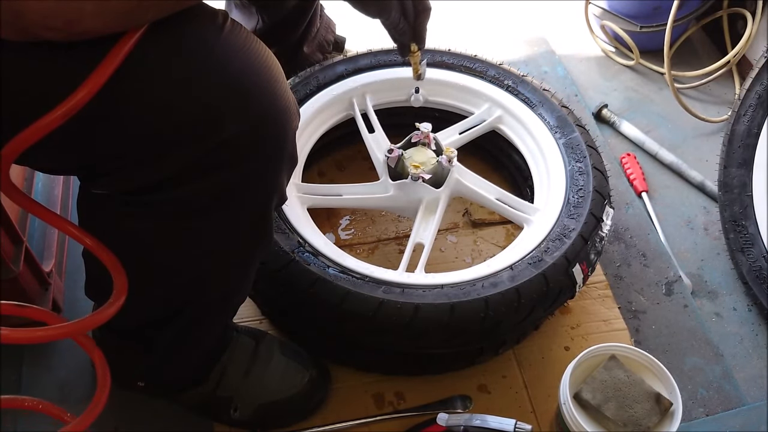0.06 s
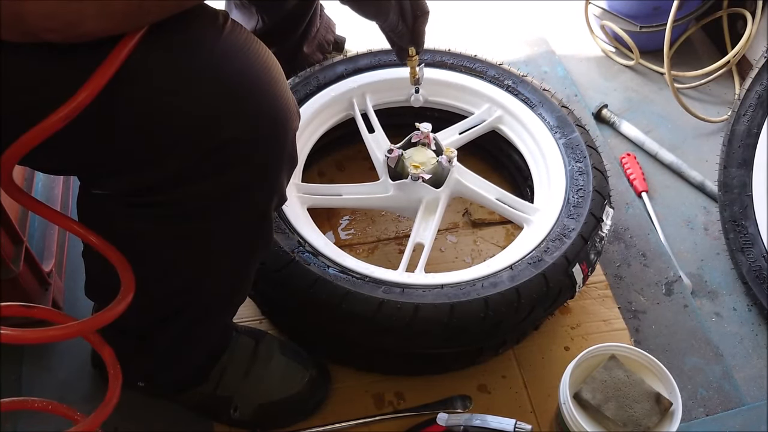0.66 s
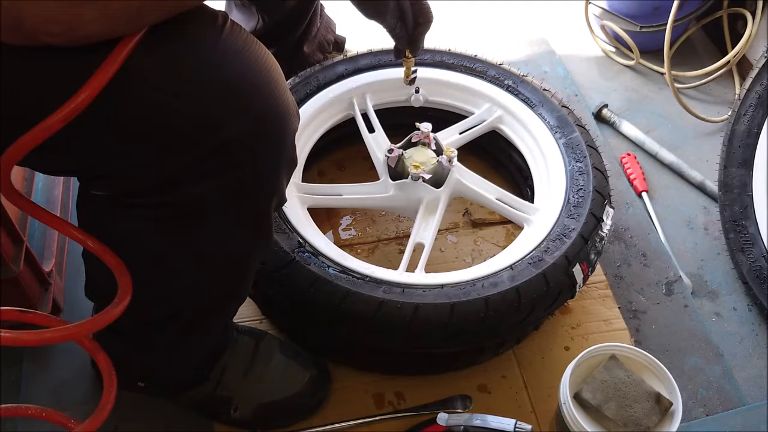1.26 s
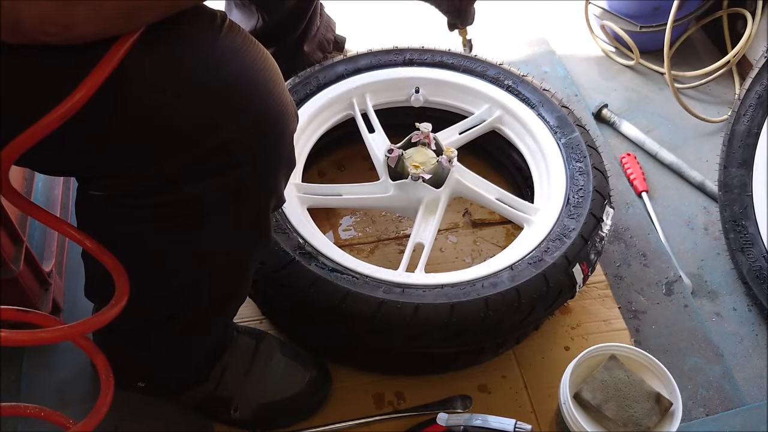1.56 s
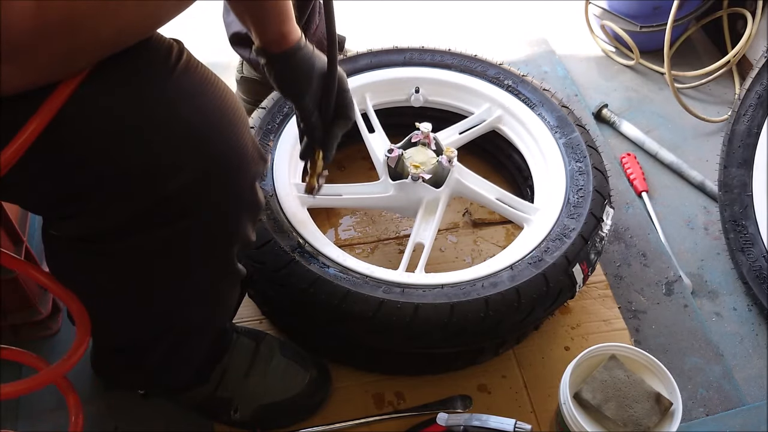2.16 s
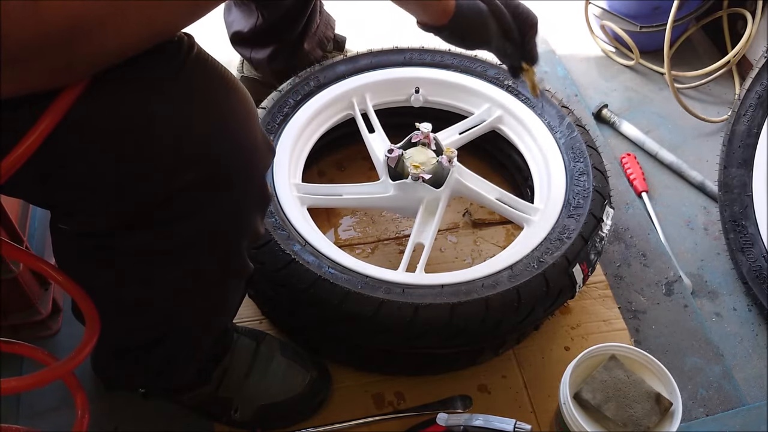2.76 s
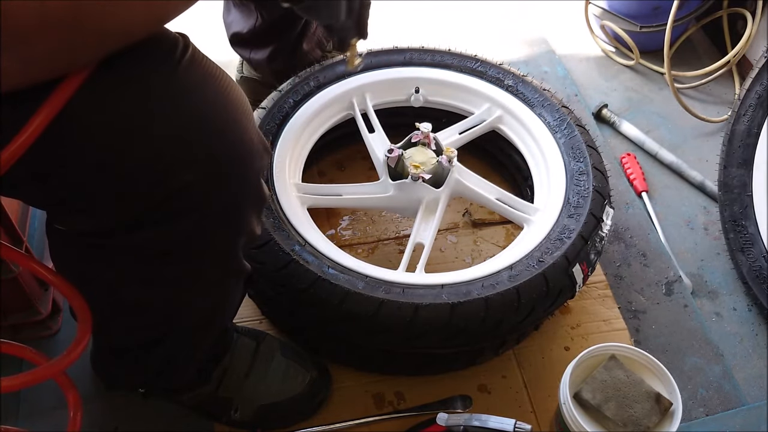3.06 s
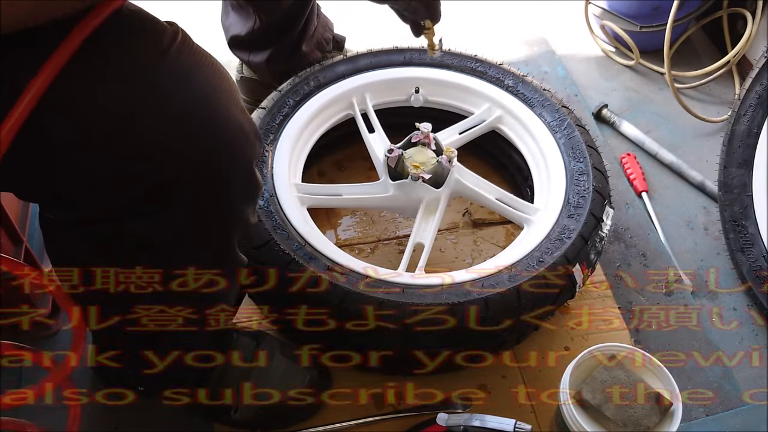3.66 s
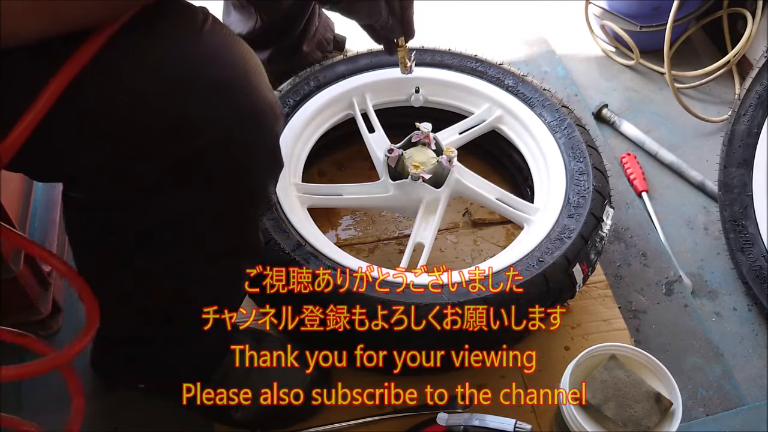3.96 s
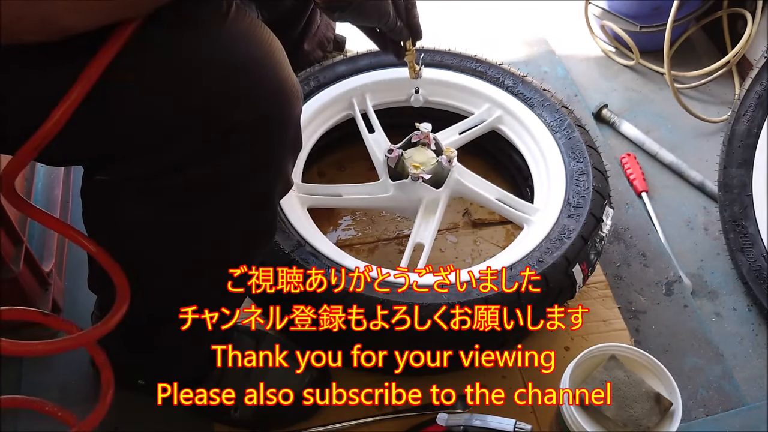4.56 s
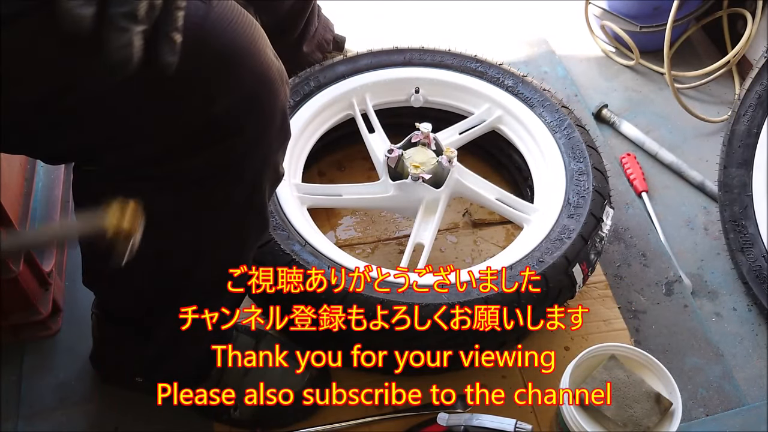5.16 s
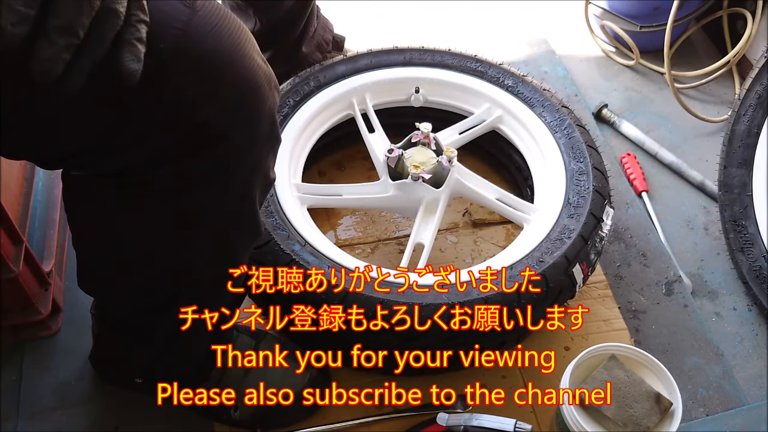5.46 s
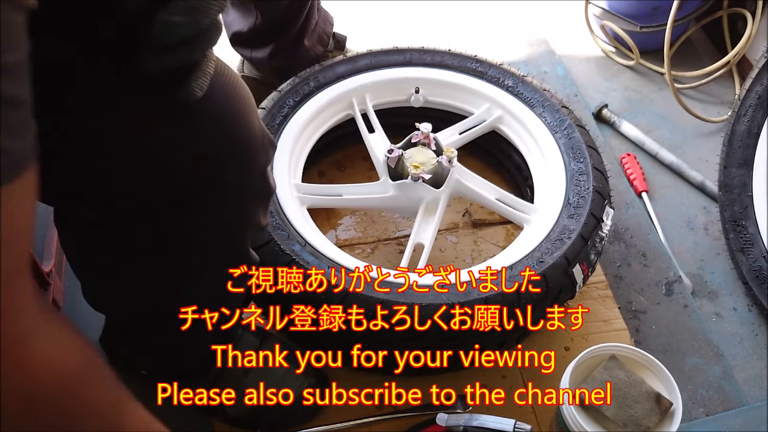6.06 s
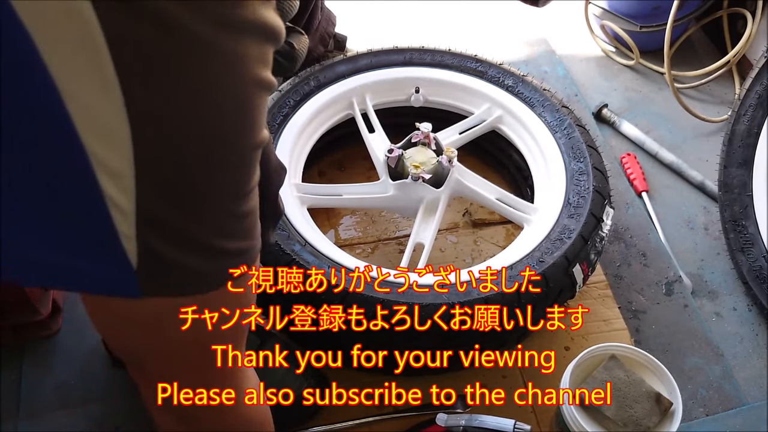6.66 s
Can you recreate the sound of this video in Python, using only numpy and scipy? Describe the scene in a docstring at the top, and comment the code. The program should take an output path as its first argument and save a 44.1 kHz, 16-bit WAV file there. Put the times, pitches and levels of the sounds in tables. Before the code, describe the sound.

A bright jet of air blows across a wheel and stops abruptly; a plastic crate then scrapes the floor with a few knocks.

```python
"""Air chuck on a motorcycle wheel

In a small workshop a jet of compressed air hisses, sings in the chuck's bore, roars where it strikes
rim and tyre, and puffs at the microphone as the hand sweeps it round. The valve closes to a faint leak.
A plastic crate scrapes on the floor in stick-slip and knocks as the worker gets up from it."""
import sys
import numpy as np
from scipy import signal
from scipy.fft import rfft, irfft
from scipy.io import wavfile
from scipy.ndimage import uniform_filter1d, map_coordinates

SR = 44100
rng = np.random.default_rng(int(sys.argv[2]) if len(sys.argv) > 2 else 0)


def put_to_file(sound):
    """Save the sound as 16-bit audio at rate SR, in the file named by the first command-line argument."""
    columns = np.atleast_2d(sound).T  # one column per channel
    safe = np.clip(columns, -1, 1)
    whole_steps = np.round(safe * 32767)
    wavfile.write(sys.argv[1], SR, whole_steps.astype(np.int16))


N = 299880
T = np.arange(N) / SR
FREQS = np.arange(N // 2 + 1) * SR / N
SHUT_S, SHUT_DB_PER_S = 4.828, 440  # the valve closes


def undb(db):
    """Decibels to gain."""
    return 10 ** (np.asarray(db) / 20)

def unit(x):
    """Scale to rms 1."""
    return x / np.sqrt(np.mean(x ** 2))

def curves(table):
    """Each column of a table, joined by straight lines in time."""
    s, *columns = np.transpose(table)
    return [np.interp(T, s, c) for c in columns]

def fade(start_s, db_per_s):
    """Gain 1 until the start, then a steady fall in dB."""
    return undb(-db_per_s * np.maximum(T - start_s, 0))

def swells(table):
    """Sum of bell-shaped swells."""
    return sum(undb(db) * np.exp(-.5 * ((T - s) / sigma_s) ** 2) for s, db, sigma_s in table)

def walk(rate_hz):
    """Slewed random levels, rms 1."""
    hold = max(int(SR / rate_hz), 2)
    steps = np.repeat(rng.standard_normal(N // hold + 1), hold)
    return unit(uniform_filter1d(steps, hold)[:N])

def colour(points):
    """Gain per frequency from (Hz, dB) points."""
    hz, db = np.transpose(points)
    return undb(np.interp(np.log(FREQS + 1), np.log(hz), db))

def resonances(modes):
    """Gain per frequency of steep-sided resonances."""
    peaks = (undb(db) / (1 + ((FREQS - hz) / width_hz * 2) ** 2) for hz, width_hz, db in modes)
    return np.sqrt(sum(peak ** 2 for peak in peaks))

def noise(gain, alike_hz=900, drive=1, alike_share=.7):
    """Stereo noise of rms 1, driven, then coloured: lows alike at both ears, highs unrelated."""
    likeness = np.clip(alike_share / (1 + (FREQS / alike_hz / 2) ** 1.7), 0, 1)
    mid, side = rfft(rng.standard_normal((2, N)) * drive) * gain * np.sqrt([1 + likeness, 1 - likeness])
    return unit(irfft(np.array([mid + side, mid - side]), N))

def jet_noise(gain):
    """Three noises of one colour: scattered left, scattered right, straight from the chuck."""
    return np.vstack([noise(gain, 300), noise(gain, 300)[:1]])

def delayed(x, lag_s):
    """Delay each channel by a fixed or moving time."""
    return np.array([map_coordinates(ear, [(T - lag_s) * SR], order=3, mode="wrap") for ear in x])

def from_left(x, lag_s=.00019):
    """A source on the left reaches the right ear late."""
    return np.vstack([x[:1], delayed(x[1:], lag_s)])

def room(x, wet_db, t60_s, apart_hz=900, treble_t60_ratio=0.81, damp_hz=3000):
    """Direct sound plus a diffuse tail whose treble dies sooner and differs left and right."""
    diffuse = noise(colour([(100, 5), (6000, -3.5), (16000, -3.0)]), apart_hz)
    low = irfft(rfft(diffuse) / (1 + (FREQS / damp_hz) ** 2), N)
    decay_db = -60 * T / t60_s
    tail = low * undb(decay_db) + (diffuse - low) * undb(decay_db / treble_t60_ratio)
    tail *= np.clip(T / 0.0029, 0, 1)
    tail = tail[:, :SR // 2] / np.sqrt(np.sum(tail ** 2) / 2)
    return x + undb(wet_db) * signal.fftconvolve(np.atleast_2d(x), tail, axes=1)[:, :N]


# Workshop background. Each row: frequency in Hz, relative density in dB.
SHOP_SPECTRUM = [(25, -14.5), (60, -20.5), (130, -12), (250, -2.5), (500, -4.5), (900, -4.5), (2000, -17),
                 (5000, -17), (8000, -33.5), (15000, -34)]

def shop_tone(level_db=-75):
    """Faint, slightly wavering room noise."""
    return noise(colour(SHOP_SPECTRUM)) * undb(level_db + 1.2 * walk(9))


# Swells of the low rumble. Each row: centre in seconds, level in dB, sigma in seconds.
RUMBLE_SWELLS = [(0.08, -58, .14), (5.5, -65.5, 0.55), (6.3, -60.5, 0.33)]

def low_rumble():
    """Low background rumble, swelling at the start and after the air stops."""
    spectrum = colour([(20, 3.0), (45, -0.5), (100, -15.0), (135, -24.5), (400, -58.5)])
    return noise(spectrum, alike_hz=20) * swells(RUMBLE_SWELLS)


# Cloth friction. Each row: frequency in Hz, relative density in dB.
CLOTH_SPECTRUM = [(100, -1), (500, 11), (1200, 7), (2300, 5.5), (3800, -9), (5500, -6), (7500, -24.5),
                  (9000, -32), (16000, -34.5)]
# Brushes of cloth. Each row: centre in seconds, level in dB, sigma in seconds.
CLOTH_BRUSHES = [(5.57, -58, 0.051), (5.965, -58.5, 0.025), (6.27, -64.5, 0.018), (6.66, -75, 0.023),
                 (6.76, -57, 0.025)]

def clothes():
    """Clothes brush in short, grainy swells."""
    return noise(colour(CLOTH_SPECTRUM)) * swells(CLOTH_BRUSHES) * undb(3.4 * walk(120))


# Jolts of a small metal part. Each row: start in seconds, level in dB.
TING_JOLTS = [(5.782, -61), (6.083, -49), (6.172, -52), (6.248, -55)]
# Its modes. Each row: frequency in Hz, width in Hz, relative level in dB.
METAL_MODES = [(12250, 560, 0.5), (13650, 600, -8.5)]

def tings(t60_s=0.16):
    """A small metal part rings thinly when jolted."""
    jolts = sum(undb(db) * (T > s) * fade(s, 60 / t60_s) for s, db in TING_JOLTS)
    return noise(resonances(METAL_MODES)) * jolts


# Crate sliding on the floor. Each row: frequency in Hz, relative density in dB.
SCRAPE_SPECTRUM = [(100, -45.5), (250, -26.5), (370, -5.5), (470, 5), (590, -7), (680, -7.5), (800, -5.5),
                   (1050, -13), (1600, -22.5), (3500, -32), (7000, -50.5), (9000, -54), (16000, -71.5)]
# Catches in the slide. Each row: centre in seconds, level in dB, sigma in seconds.
SCRAPE_CATCHES = [(5.428, -47.5, .009), (5.532, -33, .011), (5.55, -36, .006), (5.578, -35, .012),
                  (5.603, -43, .008), (5.65, -42, .018), (5.74, -48, .02)]

def crate_scrape(slip_hz=55, slide_db=-46, peak_s=5.596, stop_s=6.1, rise_db_per_s=66.5):
    """The crate's feet stick and slip unevenly; each slip shakes its low resonances."""
    slip_phase = np.cumsum(slip_hz * np.exp(0.25 * walk(40))) / SR % 1
    rise = undb(slide_db - rise_db_per_s * np.maximum(peak_s - T, 0))
    sliding = rise * fade(peak_s, db_per_s=20.5) * fade(stop_s, db_per_s=300)
    friction = noise(colour(SCRAPE_SPECTRUM), 1200, drive=np.exp(-slip_phase))
    return friction * np.hypot(sliding, swells(SCRAPE_CATCHES))


# Blows. Each row: start in seconds, strength in dB, treble tilt in dB per octave, rebound share 0-1.
CRATE_BLOWS = [(4.955, -33, -1, 0.5), (5.131, -33, -3.5, .3), (5.781, 0.5, -4, 0.6), (5.789, -9.5, -4, .3),
               (6.056, -17, -0.5, .5), (6.079, -17.5, 3, 0.4), (6.0825, 0.5, 3.5, 0.02),
               (6.101, -6.5, -10, 0.6), (6.169, -13.5, 2, 0.6), (6.19, -3.5, -16, 0.6),
               (6.262, -58.5, 11, 0.5), (6.552, -43, 0.5, .5)]
# Crate modes. Each row: frequency in Hz, relative level in dB, T60 in seconds.
CRATE_MODES = [(338, -3, 0.078), (445.4, -11.5, 0.23), (499, -4, 0.1), (575, 4.5, 0.071),
               (666, -2.5, 0.065), (789, -9, 0.12), (1004, -9, 0.11), (1226, -2.5, 0.07), (1430, -9, 0.11),
               (1720, -15, 0.05), (1865, -6, .05), (2080, -9.5, .09)]
# Contact crack. Each row: frequency in Hz, relative density in dB.
CRACK_SPECTRUM = [(60, -38), (140, -17.5), (220, -6), (320, 2.5), (700, 11.5), (1200, 3.5), (2200, -2.5),
                  (3300, -7), (4000, -13), (5000, -10.5), (6800, -11.5), (8200, -25), (12500, -28),
                  (16000, -33)]

def crate_ring(t):
    """The contact point weights the modes; higher ones reach the ears further out of phase."""
    ring = 0
    for hz, db, t60_s in CRATE_MODES:
        weight, detune, aim = rng.standard_normal(3)
        phase = 2 * np.pi * hz * (1 + 0.0099 * detune) * t + np.array([[1], [-1]]) * aim * hz / 2200
        ring = ring + np.sign(weight) * undb(db + 0.54 * weight - 60 * t / t60_s) * np.sin(phase)
    return ring

def crate_knocks(ring_db=-19, crack_db=-17.5, crack_t60_s=0.11, rebound_s=0.008, rebound_t60_s=0.065,
                 bass_hz=255, attack_s=0.00021):
    """Each blow lands on one edge, then the next: a crack and the crate's short modes."""
    out = np.zeros((2, N + SR))
    count = SR // 2
    t, hz = T[:count], np.arange(count // 2 + 1) * SR / count
    cracks = noise(colour(CRACK_SPECTRUM), 500)
    second_edge = (t > rebound_s) * undb(-60 * np.abs(t - rebound_s) / rebound_t60_s)
    radiation = (hz / (hz - 1j * bass_hz)) ** 2 * hz / np.hypot(hz, bass_hz)  # small body, little bass
    window = np.clip(np.minimum(t / attack_s, (t[-1] - t) / .1), 0, 1)
    for k, (s, db, tilt_db, rebound) in enumerate(CRATE_BLOWS):
        contact = undb(-60 * t / crack_t60_s) + rebound * second_edge
        crack = cracks[:, k * count:(k + 1) * count] * contact
        blow = undb(ring_db) * crate_ring(t) + undb(crack_db) * crack
        tilt = undb(tilt_db * np.log2(1 + hz / 900))  # soft contacts lose treble
        start = int(s * SR)
        out[:, start:start + count] += undb(db) * irfft(rfft(blow) * tilt * radiation, count) * window
    return room(out[:, :N], wet_db=-10.5, t60_s=0.27, apart_hz=450)


# Seeping air. Each row: frequency in Hz, relative density in dB.
LEAK_SPECTRUM = [(300, -4.5), (2000, 1), (4000, 0.5), (5800, 4.5), (7300, -3.5), (8700, -15), (11500, -8),
                 (13000, 3.5), (14500, 2), (16000, 6.5)]
# Bore resonance in the last air. Each row: frequency in Hz, width in Hz, relative level in dB.
LEAK_MODES = [(7050, 1300, 0)]

def leak(seal_s=5.56, tone_fade_s=5.1):
    """The closed chuck seeps until it seals; its bore sings softly in the last air."""
    seeping = (1.5 - fade(SHUT_S, SHUT_DB_PER_S)) * fade(seal_s, db_per_s=258)
    hiss = noise(colour(LEAK_SPECTRUM)) * undb(-59 + .7 * walk(26))
    tone = noise(resonances(LEAK_MODES)) * undb(-60) * fade(tone_fade_s, db_per_s=88)
    return seeping * (hiss + tone)


# Puffs on the microphone. Each row: start in seconds, strength in dB, port (left +1, right -1),
# direction (push +1, suction -1), rise in seconds.
MIC_PUFFS = [(1.447, -34, -1, -1, .008), (1.533, -22.5, -1, -1, .004), (1.961, -21, 1, 1, .0035),
             (2.42, -38, 1, 1, .01), (3.252, -19.5, -1, 1, .002), (4.072, -20, -1, -1, .003),
             (4.842, -31, -1, 1, .011)]

def puffs(hold_s=0.061, release_s=0.0073, vent_hz=3.4, eddy_share=0.1, eddy_s=0.018):
    """A push or suction on one port flutters and leaks through the vent, so it swings back slowly."""
    out = np.zeros((2, N))
    eddies = noise(colour([(15, -6.0), (60, 0), (130, -2.5), (300, -34.5), (2000, -77.5)]), 20)
    for s, db, port, push, rise_s in MIC_PUFFS:
        age_s, ear = np.maximum(T - s, 0), int(port < 0)
        pressure = np.sign(push) * (1 - np.tanh((age_s - hold_s) / release_s / 2)) / 2
        flutter = eddy_share * eddies[ear] * np.exp(-age_s / eddy_s)
        out[ear] += undb(db) * (1 - np.exp(-age_s / rise_s)) * (pressure + flutter)
    return signal.sosfilt(signal.butter(1, vent_hz, "high", fs=SR, output="sos"), out)


# Edge tones. Each row: centre in seconds, pitch in Hz, sigma in seconds, level in dB.
EDGE_NOTES = [(0.854, 620, 0.008, -38), (0.862, 900, 0.012, -31), (0.945, 1300, .01, -31),
              (0.959, 797, 0.018, -26.5), (3.561, 1301, 0.011, -26.5), (3.663, 1120, 0.018, -33.5),
              (3.92, 250, 0.0089, -41)]

def edge_tones(width_hz=130):
    """Short breathy tones where the jet catches an edge or a hollow of the wheel."""
    return sum(noise(resonances([(hz, width_hz, 0)])) * swells([(s, db, sigma_s)])
               for s, hz, sigma_s, db in EDGE_NOTES)


# The wheel's hollow. Each row: frequency in Hz, relative density in dB.
HOLLOW_SPECTRUM = [(40, -56.5), (110, -53.5), (150, -32), (190, -12), (235, -11.5), (265, -0.5),
                   (305, -0.5), (350, 6), (410, 0.5), (470, 1), (530, -2.5), (585, 3.5), (660, -5),
                   (1200, -10), (4000, -53.5)]
# Its rumble. Each row: time in seconds, relative level in dB.
HOLLOW_LEVELS = [(0.0, -37), (0.21, -42), (0.28, -37), (0.35, -47), (0.39, -31.5), (0.47, -46.5),
                 (0.52, -38.5), (0.71, -39), (0.75, -47.5), (0.85, -33), (0.88, -37.5), (0.98, -34.5),
                 (1.03, -50), (1.08, -45), (1.11, -35), (1.22, -46), (1.24, -38.5), (1.35, -47),
                 (1.42, -41.5), (1.46, -46), (1.55, -36.5), (1.59, -44.5), (1.71, -50), (1.94, -55),
                 (1.96, -37.5), (2.02, -66), (2.08, -45), (2.14, -42), (2.17, -52), (2.23, -39.5),
                 (2.41, -53.5), (2.54, -49), (2.69, -36.5), (2.7, -34.5), (2.78, -40.5), (2.86, -36),
                 (3.07, -37.5), (3.22, -54), (3.25, -38), (3.26, -43.5), (3.46, -36), (3.52, -48),
                 (3.53, -40.5), (3.72, -37.5), (3.8, -44.5), (3.85, -34), (3.89, -35), (3.93, -32),
                 (3.94, -36.5), (4.06, -33), (4.1, -32), (4.13, -33), (4.32, -35), (4.38, -42.5),
                 (4.53, -39), (4.68, -42.5), (4.71, -36), (4.8, -38)]

def hollow_rumble(gain_db=-0.5):
    """Air rumbles in the hollow of the wheel."""
    return noise(colour(HOLLOW_SPECTRUM), 700, alike_share=.88) * undb(curves(HOLLOW_LEVELS)[0] + gain_db)


# Air striking rim and tyre. Each row: frequency in Hz, relative density in dB.
ROAR_SPECTRUM = [(100, -54.5), (200, -42), (500, -11), (660, -6.5), (760, 0.5), (900, -1), (1100, 1),
                 (1500, 1.5), (1900, -1.5), (2500, -6.5), (4500, -12.5), (16000, -37)]
# Wheel modes. Each row: frequency in Hz, width in Hz, relative level in dB.
WHEEL_MODES = [(765, 53, -8.5), (1110, 120, 2.5), (1320, 67, -2), (1525, 110, 3), (2990, 240, 3),
               (3220, 220, 2)]
# How squarely the jet strikes. Each row: time in seconds, relative level in dB.
IMPACT_LEVELS = [(0, -28.5), (0.3, -28), (0.45, -31), (0.63, -27.5), (0.8, -32), (0.87, -27), (0.98, -28.5),
                 (1.03, -49.5), (1.11, -31), (1.55, -31), (1.62, -41), (1.8, -38), (1.95, -40),
                 (2.02, -45.5), (2.1, -34.5), (2.24, -33.5), (2.42, -41.5), (2.55, -37), (2.68, -31.5),
                 (2.8, -39.5), (2.9, -41), (3.12, -39.5), (3.3, -33), (3.42, -38), (3.5, -46.5),
                 (3.56, -34), (3.7, -38), (3.79, -45.5), (3.9, -37.5), (4.08, -30), (4.22, -27),
                 (4.36, -35.5), (4.49, -35), (4.6, -29.5), (4.8, -36.5)]

def wheel_roar(close, gain_db=2, close_db=-4, ring_db=-2):
    """The jet roars on rim and tyre; from close by it sets the wheel ringing."""
    roar = noise(colour(ROAR_SPECTRUM), 1100) * undb(-1.9 + close_db * close)
    ring = noise(resonances(WHEEL_MODES), 1100) * undb(ring_db) * close
    return (roar + ring) * undb(gain_db + curves(IMPACT_LEVELS)[0] + walk(70))


# Lower bore modes. Each row: frequency in Hz, width in Hz, base level in dB.
LOW_BORE_MODES = [(6730, 470, -26.5), (7204, 590, -24.5)]
# Their flaring as the chuck turns. Each row: time in seconds, relative level in dB.
SING_LEVELS = [(0.0, -22), (0.01, -22), (0.2, -23), (0.24, -20.5), (0.32, -23.5), (0.39, -19),
               (0.45, -21.5), (0.72, -20.5), (0.75, -25), (0.77, -19), (1.38, -23), (1.46, -21.5),
               (1.56, -27), (1.75, -23), (2.07, -27.5), (2.12, -22.5), (2.43, -26.5), (2.45, -22),
               (2.58, -22.5), (2.61, -21), (3.02, -25.5), (3.05, -30), (3.11, -24.5), (3.27, -19.5),
               (3.37, -26.5), (3.49, -22), (4.24, -24), (4.3, -18.5), (4.79, -20.5), (4.8, -23)]
# A broad sizzle and the upper bore modes. Each row: frequency in Hz, width in Hz, level in dB
# in open air, level in dB close to the wheel.
HIGH_BORE_MODES = [(8900, 2100, -26.5, -46.5), (10260, 600, -23.5, -27), (10800, 600, -25.5, -28),
                   (11180, 450, -29.5, -24.5)]

def bore_tones(close, sing_db, sing_slope=1.09, pitch_wander=.018, flare_db=1.0):
    """Each resonance of the bore wanders and flares on its own, most in open air."""
    out, unrest = 0, 1 - close / 2
    lower = [(hz, width_hz, db + sing_slope * sing_db) for hz, width_hz, db in LOW_BORE_MODES]
    upper = [(hz, width_hz, open_db + (close_db - open_db) * close)
             for hz, width_hz, open_db, close_db in HIGH_BORE_MODES]
    for hz, width_hz, db in lower + upper:
        tone = jet_noise(resonances([(hz, width_hz, 0)]))
        tone = delayed(tone, np.cumsum(pitch_wander * unrest * walk(16)) / SR)
        out = out + tone * unit(undb(flare_db * unrest * walk(18))) * undb(db)
    return out


# Splash, chuck held back. Each row: frequency in Hz, relative density in dB.
FAR_SPLASH_SPECTRUM = [(200, -55.5), (1500, -11), (2300, -4.5), (2750, -2.5), (3050, 0.5), (4200, 0.5),
                       (5000, 0), (6200, -15.5), (9000, -25.5)]
# Splash, chuck held close. Each row: frequency in Hz, relative density in dB.
CLOSE_SPLASH_SPECTRUM = [(200, -55), (1500, -20), (2200, -12), (2650, -3.5), (2950, 1), (3900, 2),
                         (5000, 0.5), (6000, -5), (9000, -21)]
# Sweeps over the metal. Each row: time in seconds, relative level in dB.
SWISH_LEVELS = [(0.02, -24.5), (0.05, -22.5), (0.87, -23), (0.95, -21), (1.02, -29.5), (1.1, -26.5),
                (1.11, -22), (1.35, -22), (1.67, -26), (1.94, -24.5), (2.03, -28), (2.16, -22),
                (2.2, -27.5), (2.31, -22), (2.39, -25.5), (2.66, -24), (2.75, -26.5), (2.8, -26),
                (2.92, -29.5), (3.03, -24.5), (3.41, -27.5), (3.63, -26), (3.65, -27.5), (4.15, -23),
                (4.52, -24), (4.55, -23), (4.8, -24)]

def splash(close, swish_db, base_db=-23, swish_slope=1.4):
    """Air splashes brightly off the metal; close up it turns hollow, with a sharp lower edge."""
    far = np.sqrt(1 - close) * jet_noise(colour(FAR_SPLASH_SPECTRUM))
    near = np.sqrt(close) * jet_noise(colour(CLOSE_SPLASH_SPECTRUM))
    return (far + near) * undb(base_db + swish_slope * swish_db)


# Jet turbulence. Each row: frequency in Hz, relative density in dB.
HISS_SPECTRUM = [(200, -56.5), (1000, -29.5), (2300, -12.5), (3500, -6), (5000, -1.5), (6000, 0.5),
                 (8500, 1.5), (12500, 2), (15800, -1)]

def jet_hiss(close, sing_db, swish_db, base_db=-13.5, close_db=-3, facing_slope=0.15, swish_slope=0.34):
    """Turbulent hiss; it rises a little with the splash and as the chuck faces the microphone."""
    level_db = base_db + facing_slope * sing_db + swish_slope * swish_db + close_db * close
    return jet_noise(colour(HISS_SPECTRUM)) * undb(level_db)

def lobes(x, depth_db, rate_hz=11, bands=30):
    """A jet beams each band its own way, so the bands swell and fade apart as the chuck turns."""
    place = np.sqrt(FREQS / 16000) * bands
    spectrum, out = rfft(x), 0
    for k in range(bands + 2):
        band = irfft(spectrum * np.clip(1 - np.abs(place - k), 0, 1), N)
        out = out + band * undb(depth_db * (walk(rate_hz) - depth_db * np.log(10) / 20))  # power kept
    return out

def near_echoes(x, lag_ms, per_ear=9):
    """Short echoes off spokes, rim and floor slide as the hand sweeps and trembles: a phasey colour."""
    fine = signal.resample_poly(x, 4, 1)
    fine_s = np.arange(len(fine)) * T[-1] / (len(fine) - 4)
    out = np.zeros((2, N))
    for k, (place, swing) in enumerate(rng.random((2 * per_ear, 2))):
        rest_ms = .5 + 5 * ((k // 2 + place) / per_ear) ** 1.5
        path_ms = rest_ms + 7 * (swing - .5) * lag_ms + .06 * walk(5)
        out[k % 2] += np.interp(T - path_ms / 1000, fine_s, fine, left=0) * rng.choice([-1, 1])
    return out / np.sqrt(per_ear)

def jet_paths(air, lag_ms, direct_share=.26, echo_share=.23):
    """The jet's power arrives straight (nearer ear first), as near echoes, and scattered."""
    scattered, straight = air[:2], air[2:]
    direct = np.vstack([delayed(straight, side * lag_ms / 1000 / 2) for side in (1, -1)])
    return (np.sqrt(direct_share) * direct + np.sqrt(echo_share) * near_echoes(straight[0], lag_ms)
            + np.sqrt(1 - direct_share - echo_share) * scattered)

def moving_room(x, close, wet_db=-9, t60_s=0.082, still_rad_per_s=3, sweep_rad_per_s=15):
    """Reflections turn over slowly while the hand rests close in, quickly while it sweeps."""
    turn = np.cumsum(sweep_rad_per_s + (still_rad_per_s - sweep_rad_per_s) * close) / SR
    weights = [np.cos(turn), np.sin(turn), np.cos(turn / np.e), np.sin(turn / np.e)]
    return x + sum(w * (room(x, wet_db, t60_s) - x) for w in weights) / np.sqrt(2)


# The hand's path. Each row: time in seconds, left ear's lag in ms, closeness to the wheel 0-1.
HAND_PATH = [(0, -.012, .72), (1.25, -.012, .72), (1.47, -.014, .5), (1.65, .025, .1), (1.8, -.005, .2),
             (1.97, -.057, 0), (2.15, -.06, .1), (2.26, -.087, .1), (2.45, -.045, .1), (2.7, .058, .1),
             (2.93, .092, 0), (3.08, 0, .1), (3.26, -.095, .1), (3.4, -.06, 0), (3.56, .015, .1),
             (3.66, .023, .1), (3.92, -.016, .1), (4.2, -.009, .4), (4.3, -.008, 1), (4.72, -.008, 1),
             (4.83, .044, .9)]

def jet(bleed_db=-27, bleed_db_per_s=48.5, flutter_db=0.12, lobe_db=.8,
        typical_sing_db=-24.5, typical_swish_db=-22.3):
    """The hand sweeps the jet over the wheel; the valve shuts fast and the last air bleeds out."""
    lag_ms, close = curves(HAND_PATH)
    flow = fade(SHUT_S, SHUT_DB_PER_S) + undb(bleed_db) * fade(SHUT_S, bleed_db_per_s)
    sing_db = curves(SING_LEVELS)[0] - typical_sing_db
    swish_db = curves(SWISH_LEVELS)[0] - typical_swish_db
    air = jet_hiss(close, sing_db, swish_db)
    air += np.sqrt(flow) * splash(close, swish_db)
    air += bore_tones(close, sing_db)
    air *= undb(flutter_db * walk(140))
    air = flow * lobes(air, lobe_db * (1 - close / 2))
    air = jet_paths(air, lag_ms)
    wheel = flow ** 1.6 * (wheel_roar(close) + hollow_rumble())
    pan_db = -.6 + 0.54 * walk(14)
    return moving_room(air * undb(np.array([pan_db, -pan_db]) / 2) + wheel, close)


def scene():
    """Air, then the crate, over the quiet of the shop."""
    background = leak() + clothes() + low_rumble() + shop_tone()
    air = jet() + edge_tones() + puffs()
    crate = from_left(crate_scrape() + crate_knocks())
    return background + air + crate + tings()

def record(dry):
    """Full-scale clip, then a steep low-pass."""
    top_hz = 15850
    return signal.sosfilt(signal.ellip(12, .1, 85, top_hz, fs=SR, output="sos"), np.clip(dry, -1, 1))


dry = scene()
out = record(dry)
put_to_file(out)
```